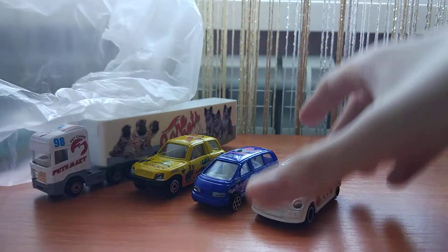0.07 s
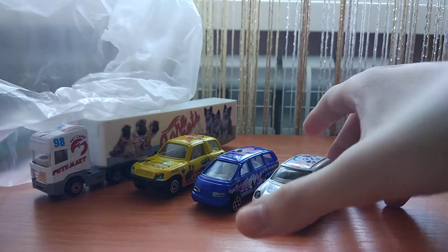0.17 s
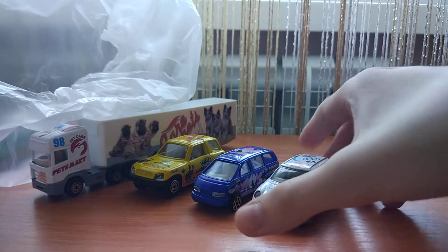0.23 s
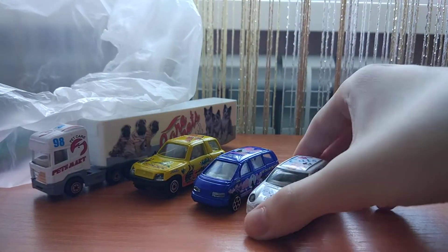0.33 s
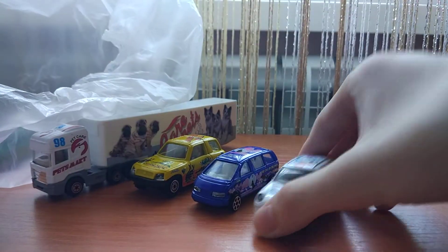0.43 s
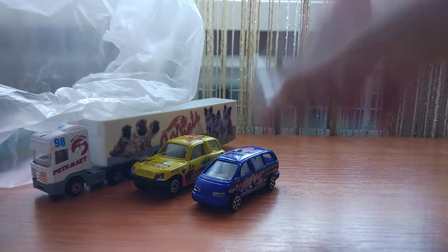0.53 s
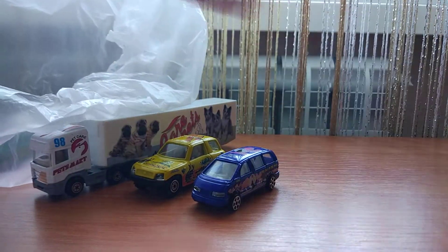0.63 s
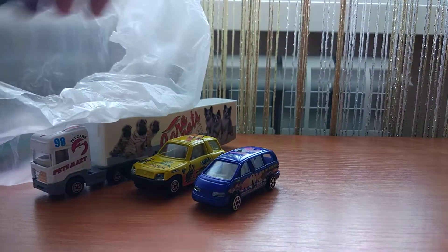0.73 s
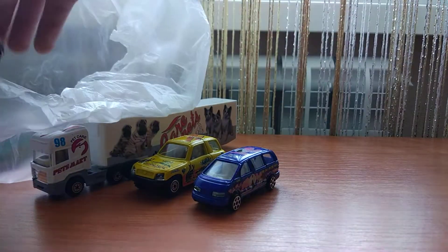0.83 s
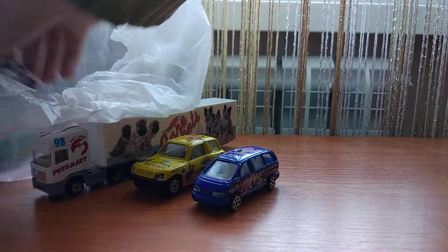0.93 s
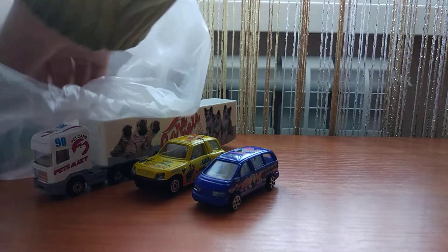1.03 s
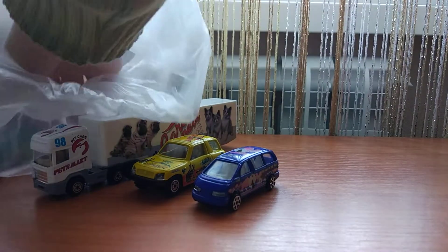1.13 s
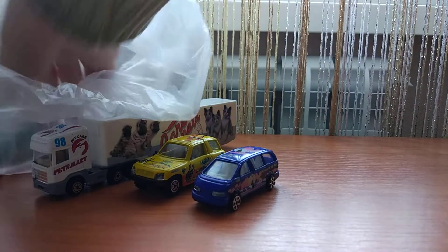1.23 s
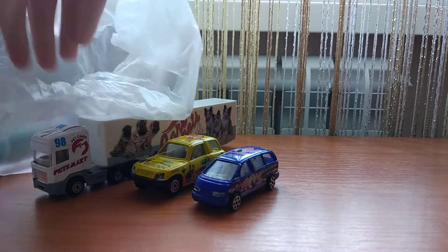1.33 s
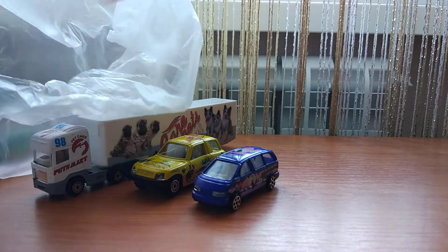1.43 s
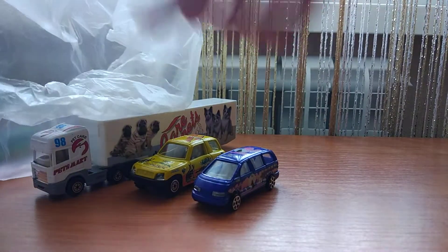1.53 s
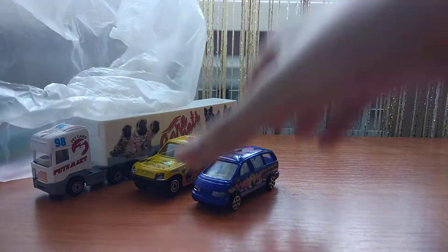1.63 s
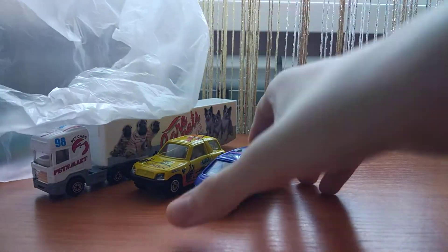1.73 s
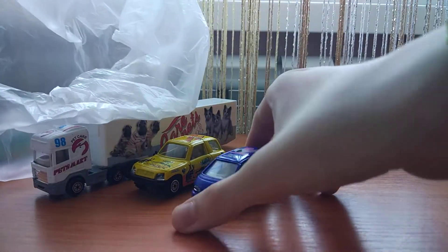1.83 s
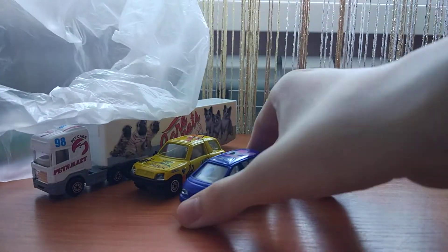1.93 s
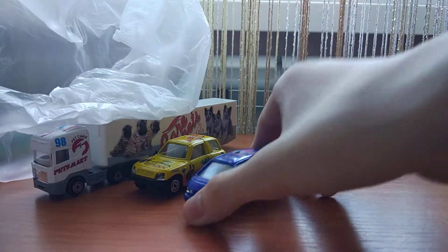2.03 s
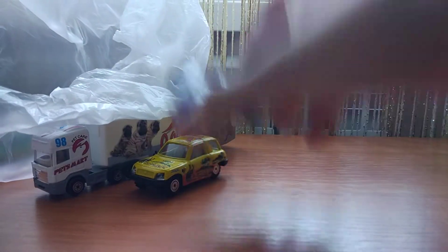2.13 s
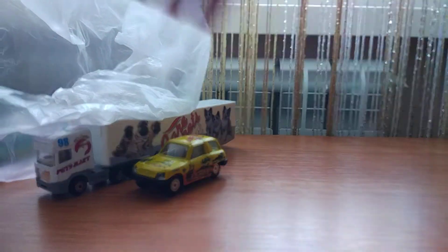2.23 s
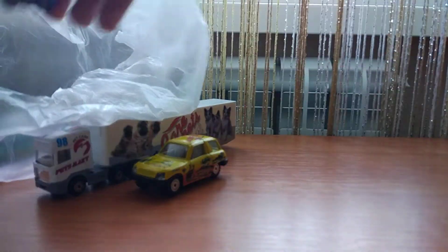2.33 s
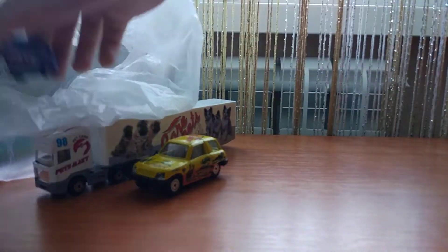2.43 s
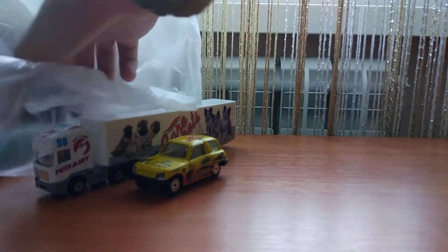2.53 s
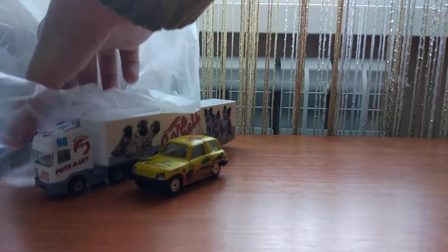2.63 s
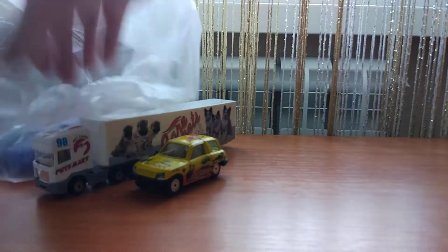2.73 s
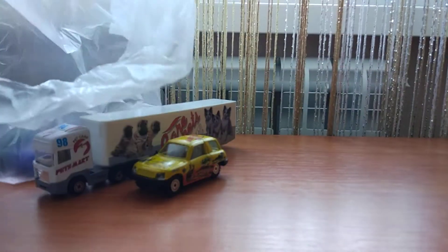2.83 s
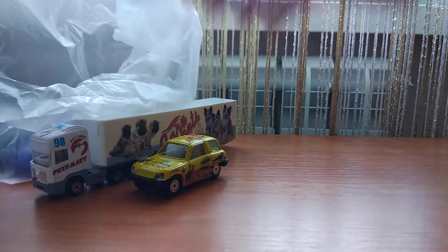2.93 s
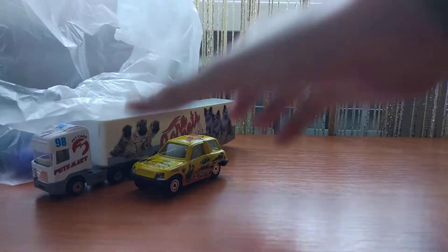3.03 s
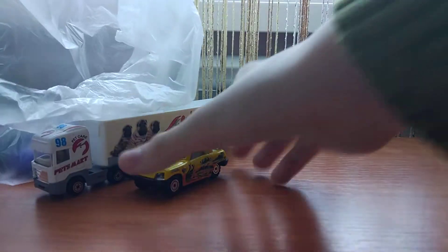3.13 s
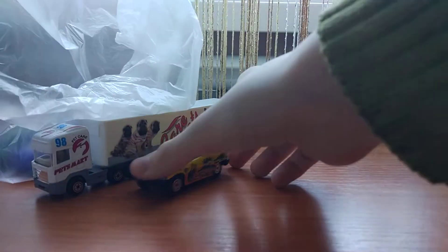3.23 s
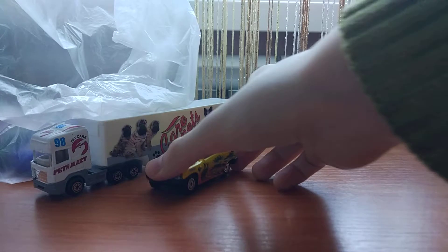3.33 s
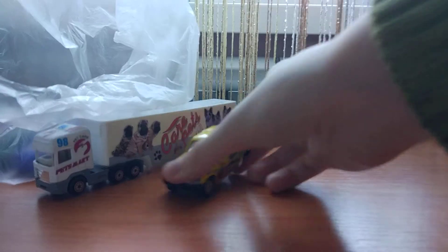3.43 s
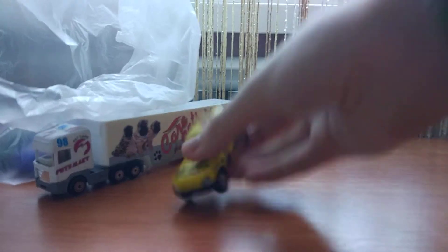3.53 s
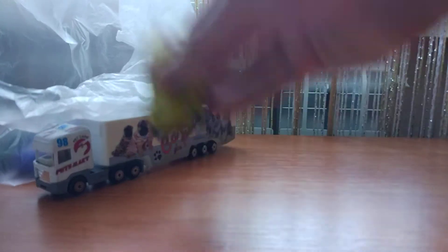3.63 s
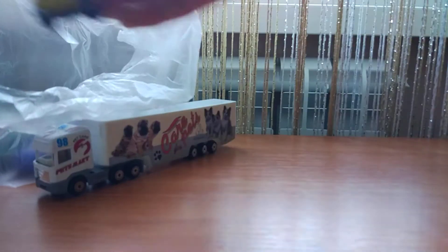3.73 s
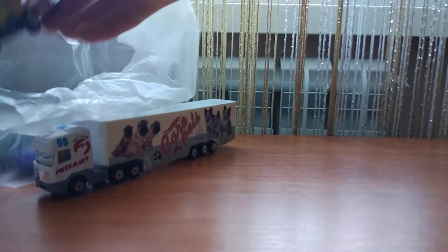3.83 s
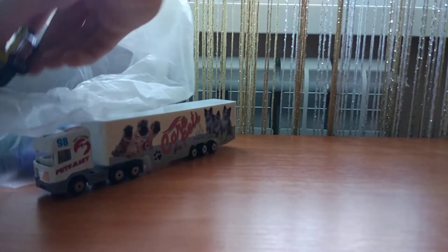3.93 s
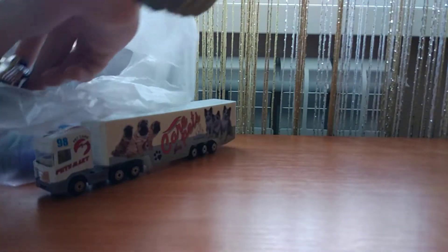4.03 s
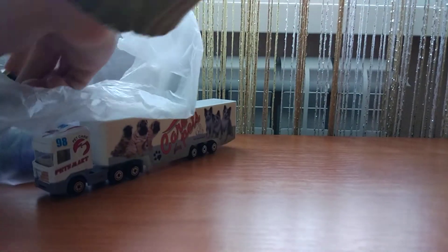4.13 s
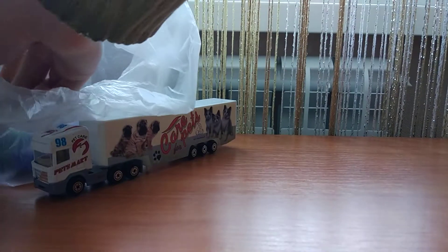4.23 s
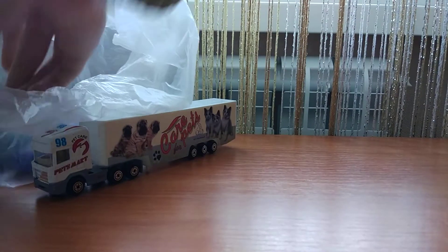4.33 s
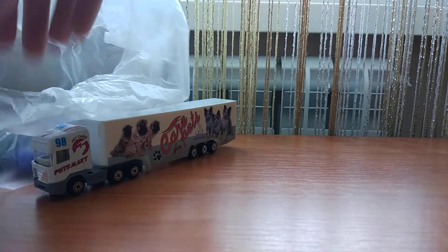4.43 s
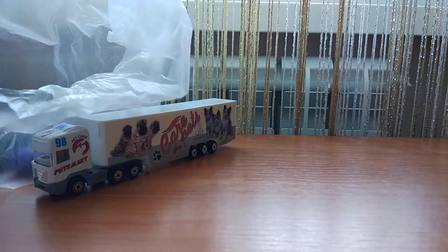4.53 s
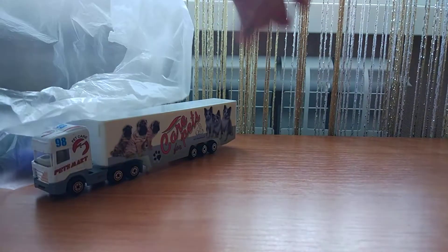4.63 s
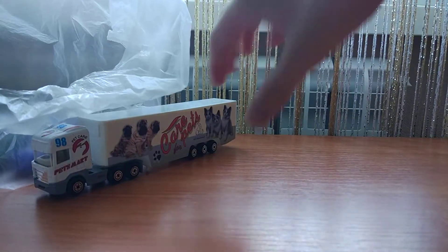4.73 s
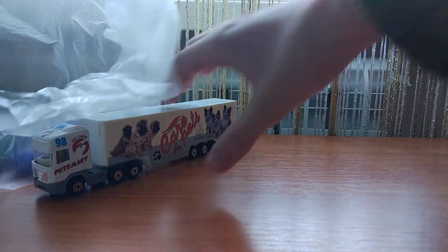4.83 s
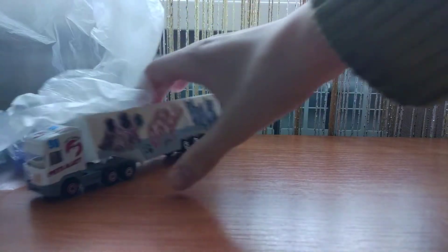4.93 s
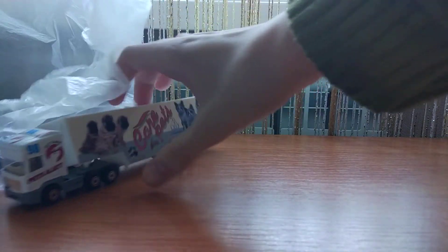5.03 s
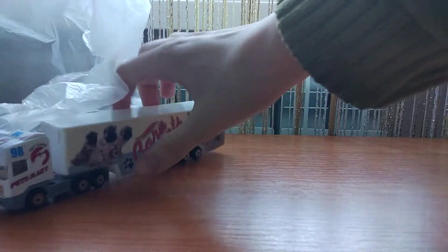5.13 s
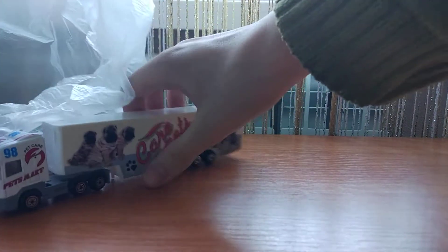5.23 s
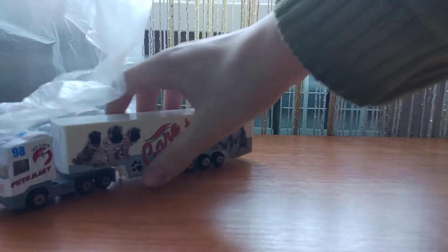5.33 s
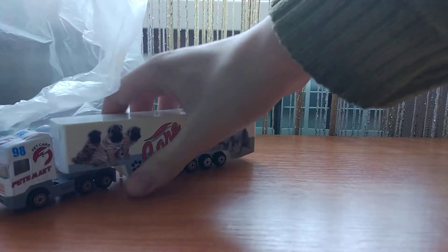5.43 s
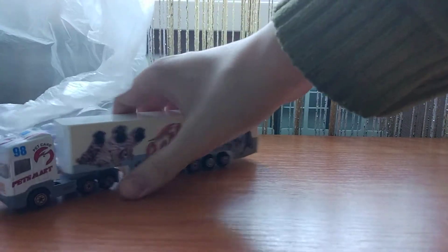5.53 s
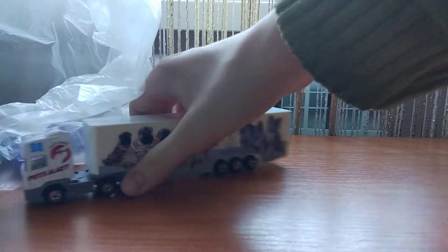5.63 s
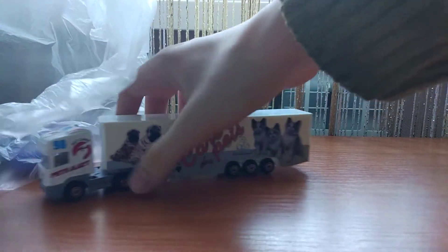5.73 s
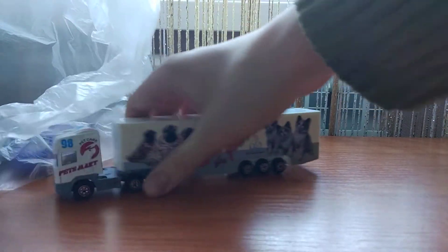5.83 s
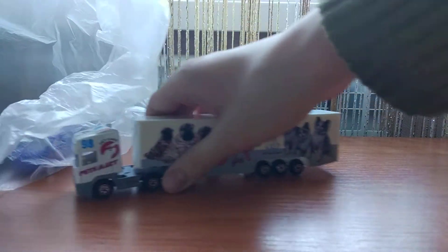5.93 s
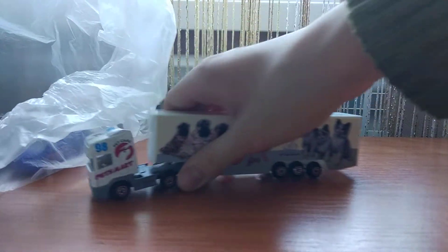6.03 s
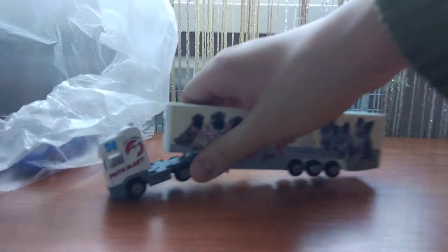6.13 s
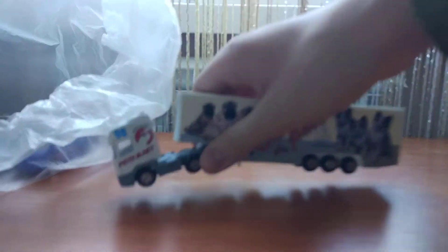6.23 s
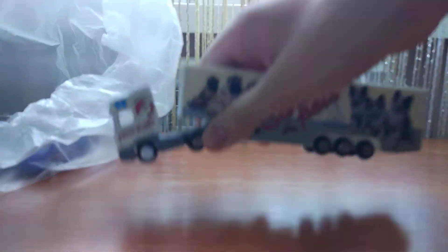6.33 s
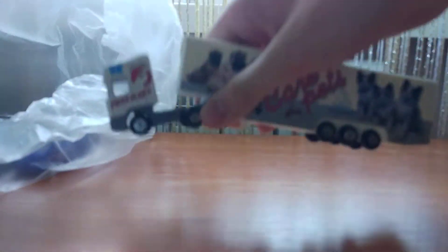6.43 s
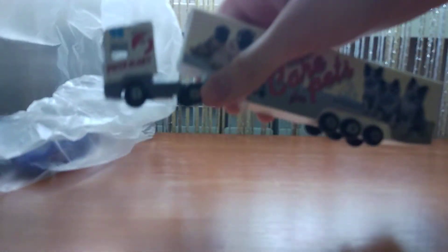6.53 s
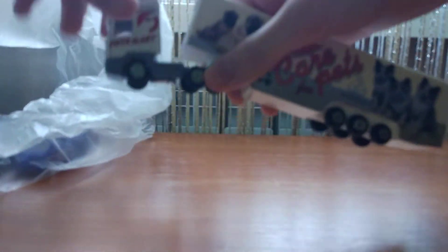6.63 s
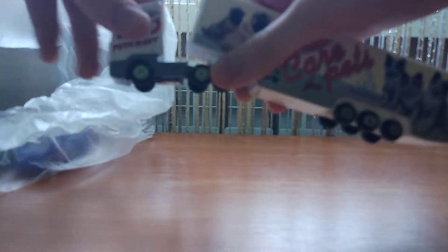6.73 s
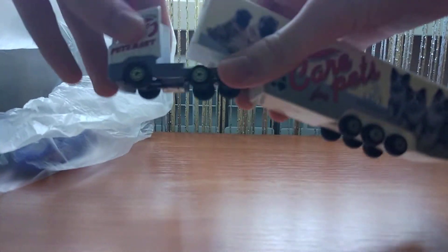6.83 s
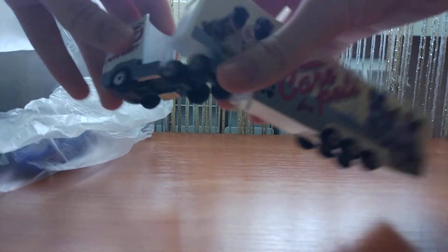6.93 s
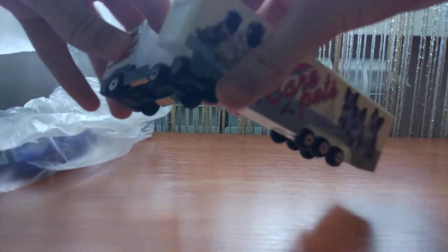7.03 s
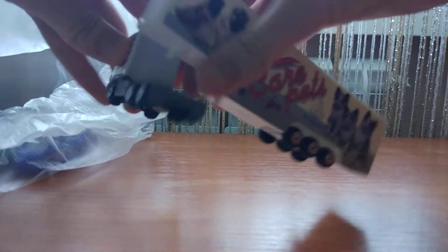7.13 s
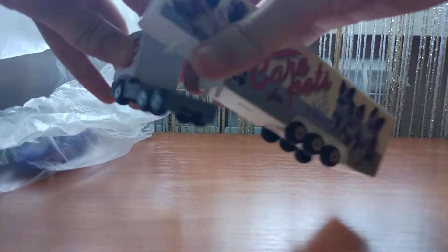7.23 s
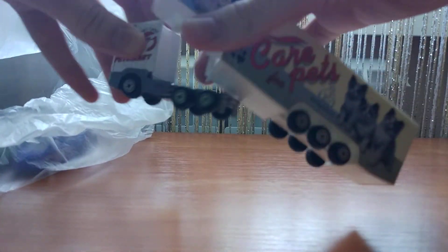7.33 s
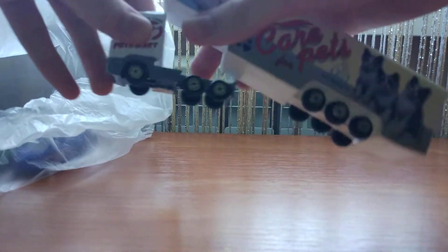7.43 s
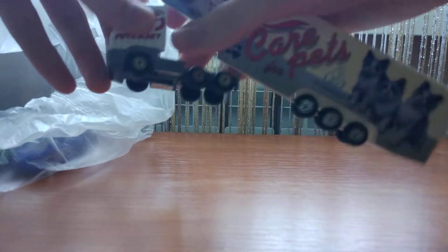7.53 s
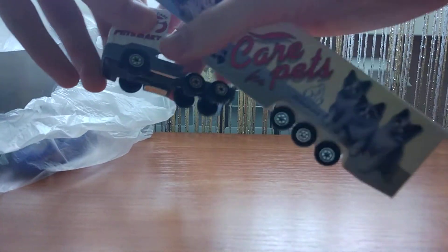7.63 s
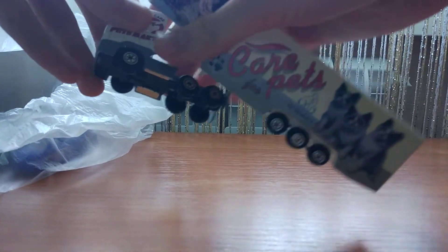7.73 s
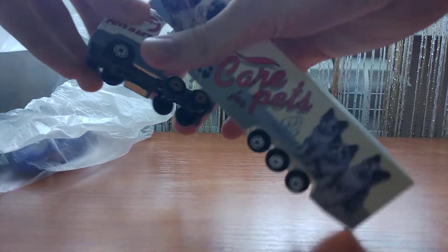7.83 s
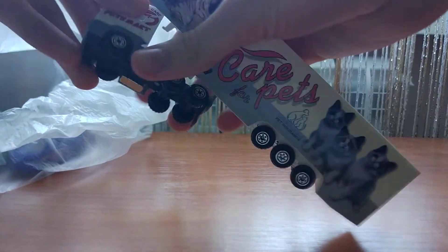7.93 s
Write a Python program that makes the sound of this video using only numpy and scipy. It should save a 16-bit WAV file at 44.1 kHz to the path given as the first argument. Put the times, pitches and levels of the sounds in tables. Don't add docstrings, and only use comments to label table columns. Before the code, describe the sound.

A small quiet room with faint hiss, recorded close in stereo; bright bag crinkles lean left. At 0.3-0.7 s a small metal car is picked up with tiny ticks and rattles. Film crinkles from 0.75 s, snapping at 1.1 s, and the car lands with clacks at 1.35-1.5 s, leaving a faint ring. A soft touch and tick at 1.9 s, quiet, then bag snaps at 2.5-2.6 s and a loud dense cluster of metallic clacks with table thuds at 2.7-2.87 s. Light rattling at 3.25-3.55 s, thin crinkles around 4.15-4.3 s, then another hard clatter at 4.32-4.46 s. From 4.83 s a hollow plastic truck scrapes and bumps on wood, strongest at 5.14 and 5.23 s, again at 5.6-5.85 s. Lifted after 6.1 s, it gives light axle ticks, then boxy joint knocks from 6.9 s, loudest at 7.34-7.4 and 7.57-7.7 s, with final clicks near 7.85 s.

```python
import sys
import numpy as np
from scipy import signal
from scipy.fft import rfft, irfft, next_fast_len
from scipy.io import wavfile
from scipy.ndimage import uniform_filter1d, map_coordinates

SR = 44100
rng = np.random.default_rng(int(sys.argv[2]) if len(sys.argv) > 2 else 0)


def wrap_up_sound(samples):
    columns = np.atleast_2d(samples).T
    tamed = np.clip(columns, -1, 1)
    steps = np.round(tamed * 32767).astype(np.int16)
    wavfile.write(sys.argv[1], SR, steps)


def nominal_scale(level):
    x = np.asarray(level, float) / 20
    return 10 ** x


N = 351477
TOP_HZ = 15850

# (pitch [Hz], width [Hz], level [dB])
METAL = [(3000, 110, -4), (4500, 200, -7), (6360, 1400, -6.5)]
# (pitch [Hz], width [Hz], level [dB])
HOLLOW = [(450, 50, 7.5), (646, 220, -4), (1330, 57, 3.5), (1700, 530, 1.5), (2120, 170, -16),
          (3140, 210, 7)]
# (pitch [Hz], width [Hz], level [dB])
BOARD = [(190.6, 12, 0.5), (223.7, 27, 6.5), (267.5, 13, 3.5), (313.2, 4.5, 3.5), (380, 4.5, -1),
         (403, 17, -54)]
# (start [s], held [s], scrape level [dB], table hum level [dB])
TOUCHES = [(.3, 0.12, -55.5, -66), (.97, 0.2, -58, -56), (1.2, 0.1, -40, -54.5), (1.38, 0.099, -35, -43),
           (1.89, 0.062, -45, -49), (2.44, 0.2, -47, -58), (2.71, 0.13, -35.5, -38),
           (3.16, 0.027, -58, -54.5), (3.27, 0.076, -43, -53), (3.38, 0.088, -44, -58.5),
           (4.33, 0.0083, -34.5, -40.5), (4.4, 0.013, -36, -31.5), (4.45, 0.03, -27.5, -31),
           (4.92, 0.06, -32.5, -40.5), (5.07, 0.023, -26, -36), (5.17, 0.095, -29.5, -43),
           (5.3, 0.043, -39, -52), (5.55, 0.16, -33, -46.5), (5.72, 0.12, -58, -49),
           (5.845, 0.012, -25.5, -38), (5.94, 0.062, -31.5, -49), (6.04, 0.028, -41, -49),
           (6.7, 0.18, -55.5, -64), (7.03, 0.19, -56, -69), (7.55, 0.079, -43.5, -75),
           (7.67, 0.077, -49, -62)]


def unit(x):
    return x / np.sqrt(np.mean(x ** 2) + 1e-20)


def along(points, hz):
    f, v = np.transpose(points)
    return np.interp(np.log(hz + 1), np.log(f + 1), v)


def wobble(rate):
    knots = rng.standard_normal(int(N * rate / SR) + 4)
    return map_coordinates(knots, [np.arange(N) * rate / SR])


def filtered(x, response):
    m = next_fast_len(x.shape[-1] + 8192)
    spectrum = rfft(x, m) * response(np.fft.rfftfreq(m, 1 / SR))
    return irfft(spectrum, m)[..., :x.shape[-1]]


def resonances(modes, between_db):
    def response(f):
        ringing = sum(nominal_scale(db) * 1j * f * w / (c * c - f * f + 1j * f * w) for c, w, db in modes)
        return nominal_scale(between_db) + ringing
    return response


def struck(modes):
    return [(hz, width, db + rng.normal(0, 3.5)) for hz, width, db in modes]


def highpass(hz):
    return lambda f: (1j * f / (hz + 1j * f)) ** 2


def lumps(depth_db, count):
    knots = depth_db * rng.standard_normal(count)
    return lambda f: nominal_scale(np.interp(np.sqrt(f / (SR / 2)), np.linspace(0, 1, count), knots))


def lag(s):
    # (time [s], delay of the left port [ms])
    place = [(.45, .18), (.55, -.2), (1.8, -.15), (1.88, .09), (2.4, .09), (2.5, -.14), (3.1, -.14),
             (3.2, .03), (3.9, .04), (4.0, -.2), (4.6, -.2), (4.8, 0), (5.9, -.04), (6.1, .1), (8, .18)]
    late_s = np.interp(s, *np.transpose(place)) / 1000
    return lambda f: np.exp(-1j * np.pi * f * late_s * np.array([[1], [-1]]))


def gestures(rows, column, rule):
    rise, fall, linger_db, linger_fall, rest_db = rule
    t = np.arange(0, N + 64, 64) / SR
    start, held, db = np.array(rows)[:, [0, 1, column], None].transpose(1, 0, 2)
    before = np.maximum(start - t, 0)
    after = np.maximum(t - start - np.abs(held), 0)
    remnant = (after > 0) * nominal_scale(linger_db - linger_fall * after)
    shape = nominal_scale(db - rise * before) * (nominal_scale(-fall * after) + remnant)
    gain = np.sqrt(nominal_scale(2 * rest_db) + np.sum(shape ** 2, axis=0))
    return np.interp(np.arange(N) / SR, t, gain)


def grains(count, low_hz, high_hz, cycles, scatter_db, spread_s, clump_db):
    draw = rng.random((count, 4))
    hz = low_hz * (high_hz / low_hz) ** draw[:, 1:2]
    start = (draw[:, 0] * (N - 200)).astype(int) + 30
    clump = clump_db * (wobble(50) + wobble(250))[start]
    size = nominal_scale(-scatter_db * np.log(1.01 - draw[:, 2]) + clump)[:, None]
    step = np.arange(96)
    pair = []
    for side in (-.5, .5):
        t = step / SR - side * spread_s * (2 * draw[:, 3:] - 1) - spread_s / 2
        click = size * (t > 0) * np.sin(2 * np.pi * hz * t) * np.exp(-np.abs(t) * hz / cycles)
        pair.append(np.bincount((start[:, None] + step).ravel(), click.ravel(), N)[:N])
    return unit(np.array(pair))


def patchy(depth_db):
    z = signal.stft(rng.standard_normal((2, N)), nperseg=256)[2]
    field = uniform_filter1d(rng.standard_normal(z.shape[1:]), size=16, axis=0)
    field = uniform_filter1d(field, size=3, axis=1)
    return unit(signal.istft(z * nominal_scale(depth_db * unit(field)), nperseg=256)[1][:, :N])


def room(x, length):
    # (pitch [Hz], time to fall 60 dB [s])
    walls = [(200, 0.047), (2000, 0.3), (10000, 0.21)]
    hz, t, z = signal.stft(rng.standard_normal((2, length)), SR, nperseg=256)
    tail = signal.istft(z * nominal_scale(-60 * t / along(walls, hz)[:, None]), SR, nperseg=256)[1]
    return signal.fftconvolve(x, tail / np.linalg.norm(tail[0]), axes=1)


def damped_notes(events, rise_s, level_db):
    out, t = np.zeros(N + SR), np.arange(SR // 4) / SR
    for s, db, hz, t60 in events:
        pair = np.sin(2 * np.pi * hz * t) + .5 * np.sin(2 * np.pi * 1.17 * hz * t)
        fade = nominal_scale(db + level_db - 60 * t / t60) * (1 - np.exp(-t / rise_s))
        out[round(s * SR):][:len(t)] += fade * pair
    return filtered(out[:N], highpass(182)) * nominal_scale([[-2], [2]])


def shivers(events, width, rise_s):
    out, t = np.zeros((2, N + SR)), np.arange(3072) / SR
    for s, db, hz, t60 in events:
        fade = nominal_scale(-60 * t / t60) * (1 - np.exp(-(t / rise_s) ** 2))
        shiver = fade * (rng.standard_normal(len(t)) + 1.05 * rng.standard_normal((2, len(t))))
        part, late = resonances([(hz, width * hz, 0)], between_db=-20), lag(s)
        ring = filtered(shiver, lambda f: part(f) * late(f) * highpass(400)(f))
        out[:, round(s * SR):][:, :len(t)] += nominal_scale(db) * ring / np.max(np.abs(ring))
    return out[:, :N] + nominal_scale(-5) * room(out[:, :N], length=6500)[:, :N]


def knocks(events, usual_t60, modes, between_db, level_db, thud_db, wet_db, rise, top_db, lead_db, dip_db,
           lean_db, shorten=0):
    lead_s, lead_grows_s, t60_scatter = .012, .003, .15
    out, t = np.zeros((2, N + SR)), np.arange(3072) / SR
    for s, db, treble_db, body_db in events:
        t60 = usual_t60 * nominal_scale(-shorten * treble_db) * np.exp(t60_scatter * rng.standard_normal())
        u = np.maximum(t - lead_s, 0)
        swell = nominal_scale(-60 * u / max(t60, .004)) * (1 - np.exp(-(u / (rise * t60)) ** 2))
        swell = swell + nominal_scale(lead_db) * np.exp(-np.abs(t - lead_s) / lead_grows_s)
        spray = swell * nominal_scale(5 * rng.standard_normal(len(t)))
        alike = np.array([[.87], [.44]]) * rng.standard_normal((2, len(t)))
        blow = spray * np.array([alike[0] + alike[1], alike[0] - alike[1]])
        body = resonances(struck(modes), between_db)
        colour = lumps(depth_db=3, count=30)
        tilt = [(250, body_db + 13.5), (900, body_db + 14), (3300, 0), (4500, dip_db),
                (9000, treble_db + 2.5), (11500, treble_db), (16000, 1.22 * treble_db + top_db)]
        ring = filtered(blow, lambda f: body(f) * colour(f) * lag(s)(f) * highpass(200)(f) * nominal_scale(along(tilt, f)))
        ring = ring / np.max(np.abs(ring))
        push = (u > 0) * np.exp(-u / 0.00033) * nominal_scale(thud_db + body_db)
        push = filtered(push, resonances(struck(BOARD), between_db=-6))
        push = filtered(push, lambda f: highpass(140)(f) ** 2)
        pan_db = 0.14 * treble_db + lean_db
        hit = nominal_scale(db + level_db) * (ring * nominal_scale([[pan_db], [-pan_db]]) + push)
        tail = nominal_scale(wet_db) * room(hit[:, :1536], length=6500)
        start = round((s - lead_s - .3 * rise * t60) * SR)
        out[:, start:][:, :len(t)] += hit
        out[:, start + 200:][:, :tail.shape[1]] += tail
    return out[:, :N]


def metal_knocks(events, t60_s, wet_db, shorten=0):
    return knocks(events, t60_s, METAL, between_db=0, level_db=-2, thud_db=-3, wet_db=wet_db, rise=.09,
                  top_db=0, lead_db=-31, dip_db=-1, lean_db=.5, shorten=shorten)


def plastic_knocks(events, t60_s, top_db, lead_db):
    return knocks(events, t60_s, HOLLOW, between_db=2.5, level_db=-2.5, thud_db=-22, wet_db=-11, rise=.088,
                  top_db=top_db, lead_db=lead_db, dip_db=-1.5, lean_db=-.55)


def room_tone():
    # (pitch [Hz], level per Hz [dB])
    air = [(24, -45), (40, -27), (91, -16), (171, 12), (231, 14.5), (896, -18), (2770, 4), (5720, -0.5),
           (9450, -44), (16000, -58)]
    shared, own = rng.standard_normal(N), rng.standard_normal((2, N))
    bass = filtered(shared, lambda f: 1 / (1 + (f / 700) ** 2))
    treble = filtered(own, lambda f: 1 / (1 + (700 / (f + 1)) ** 2))
    return nominal_scale(-69) * unit(filtered(bass + treble, lambda f: nominal_scale(along(air, f))))


def lens():
    # (first step [s], number of steps)
    focus = [
        (2.0828, 7),
        (3.8475, 2),
        (6.1452, 4),
    ]
    step_s = .03327
    case = [(1900, 700, 0), (3300, 900, 0)]  # (pitch [Hz], width [Hz], level [dB])
    kicks = np.zeros(N)
    for s, steps in focus:
        for k in range(steps):
            kicks[round((s + k * step_s) * SR)] = 1
    clicks = np.convolve(kicks, rng.standard_normal(60))[:N]
    clicks = filtered(clicks, resonances(case, between_db=-40))
    return nominal_scale(-42) * clicks / np.max(np.abs(clicks)) * nominal_scale([[-14], [0]])


def table():
    # (rise [dB/s], fall [dB/s], lingering level [dB], its fall [dB/s], level at rest [dB])
    hum_rule = (1000, 170, -35, 40, -68)
    push = nominal_scale(2.6 * wobble(40)) * (rng.standard_normal(N) + 0.45 * rng.standard_normal((2, N)))
    hum = filtered(push, resonances(BOARD, between_db=-24))
    hum = filtered(hum, lambda f: highpass(135)(f) ** 4 / (1 + 1j * f / 600))
    return nominal_scale(-3) * nominal_scale([[-1.5], [1.5]]) * gestures(TOUCHES, -1, hum_rule) * unit(hum)


def thumps():
    # (time [s], peak level [dB], pitch [Hz], time to fall 60 dB [s])
    thuds = [(0.284, -43.5, 231, 1), (0.334, -37, 232, 0.29), (1.289, -26.5, 248, 0.047),
             (1.34, -25.5, 320, 0.069), (1.395, -32, 204.3, 0.56), (1.906, -34.5, 246.4, 0.37),
             (1.95, -36, 230, 0.11), (2.7095, -9.5, 241, 0.034), (2.747, -13.5, 325, 0.029),
             (2.803, -22, 330, .04), (2.837, -18, 294, 0.048), (1.397, -20, 330, 0.058),
             (4.424, -14, 334, .05), (4.341, -32, 295, 0.045), (5.848, -24.5, 274, 0.098),
             (2.78, -23, 366, 0.059), (3.274, -32, 232, 0.048), (3.302, -31, 215.5, 0.19),
             (4.32, -27.5, 257, 0.11), (4.462, -14, 380, 0.036), (4.525, -24, 397, 0.044),
             (4.3925, -7.5, 337, 0.037), (4.44, -18, 398, 0.06)]
    return damped_notes(thuds, rise_s=.0014, level_db=-4)


def scrape():
    # (pitch [Hz], width [Hz], level [dB])
    wheels = [(1421, 12, 9.5), (1790, 130, -5.5), (2376, 340, 0), (3530, 1770, 11)]
    # (rise [dB/s], fall [dB/s], lingering level [dB], its fall [dB/s], level at rest [dB])
    scrape_rule = (275, 231, -76, 31, -62.5)
    ticking = grains(count=12000, low_hz=700, high_hz=5000, cycles=.6, scatter_db=3, spread_s=.0003, clump_db=2.5)
    chassis = filtered(ticking + .5 * patchy(depth_db=-5.5), resonances(wheels, between_db=-34))
    dull = filtered(chassis, lambda f: highpass(450)(f) / (1 + 1j * f / 3500) ** 2)
    return nominal_scale(-12) * gestures(TOUCHES, 2, scrape_rule) * unit(dull)


def bag():
    # (pitch [Hz], level per Hz [dB])
    film_colour = [(290, -31.5), (500, -9.5), (2360, -17.5), (3700, -14.5), (5240, -9), (7420, -5),
                   (9770, -2), (16000, -5)]
    # (start [s], held [s], crinkle level [dB])
    crinkle = [(0.0, 0.0064, -56), (.76, 0.22, -61.5), (.98, 0.013, -46), (1.06, 0.19, -46),
               (1.3, 0.16, -45), (2.37, 0.1, -55), (2.5, 0.039, -52), (2.575, 0.03, -39.5),
               (2.64, .05, -53), (2.72, 0.061, -40.5), (3.35, 0.29, -58.5), (3.87, 0.32, -54.5),
               (4.2, 0.14, -52), (4.32, 0.059, -40.5), (4.46, 0.066, -43), (4.855, 0.13, -48),
               (5.07, 0.06, -43.5), (5.25, 0.39, -55.5), (5.82, 0.069, -52), (5.93, 0.13, -56.5),
               (6.5, 0.098, -57.5), (6.64, 0.16, -54.5), (6.95, 0.016, -51.5)]
    # (rise [dB/s], fall [dB/s], settling level [dB], its fall [dB/s], level at rest [dB])
    film_rule = (204, 172, -17, 18, -74)
    # (from [s], to [s], level change [dB])
    relax = [
        (2.7, 2.94, -10),
        (3.035, 3.15, -39),
        (3.771, 3.845, -4.5),
        (0.1, 0.18, -5),
        (4.66, 4.822, -6.5),
        (2.08, 2.355, -10),
    ]
    snapping = grains(count=21000, low_hz=2500, high_hz=16000, cycles=.8, scatter_db=3.4, spread_s=.0005,
                      clump_db=3.2)
    folds = nominal_scale(2.2 * wobble(45) + 2.2 * wobble(160)) * patchy(depth_db=4)
    sheet = snapping + .8 * folds

    def aside(f):
        return np.array([np.ones_like(f), 1 / (1 + 1j * f / 7000)])
    film = unit(filtered(sheet, lambda f: nominal_scale(along(film_colour, f)) * aside(f)))
    t = np.arange(N) / SR
    rest = nominal_scale(sum(db * ((t > start) & (t < end)) for start, end, db in relax))
    return nominal_scale(4.5) * gestures(crinkle, 2, film_rule) * uniform_filter1d(rest, size=500) * film


def creases():
    # (time [s], peak level [dB], treble level [dB])
    snaps = [(.252, -37, -5.5), (0.3622, -31.5, 12), (0.397, -31, 8), (0.4394, -33, -8), (.449, -33, -12.5),
             (0.5312, -38, 7), (0.6215, -46, 10), (0.641, -40, -16), (0.7416, -31, 0.5), (0.786, -33.5, 2),
             (0.801, -29, 26), (0.9739, -24, -0.5), (1.1218, -14, 9), (1.287, -16.5, 3), (1.844, -34, 10),
             (2.017, -33, -4), (2.0578, -32, -7.5), (2.2325, -29, -3.5), (2.244, -30, -6),
             (2.601, -10.5, 8), (3.041, -30, 20.5), (3.423, -27.5, 7), (3.693, -29, 17), (3.768, -27, 36),
             (3.8445, -31, -3.5), (4.146, -23, 26), (4.198, -23, 20), (4.246, -27, 19), (4.274, -18.5, 12),
             (4.301, -20, -2)]
    body_db = -23
    return metal_knocks([row + (body_db,) for row in snaps], t60_s=.023, wet_db=-14, shorten=.6)


def ticks():
    # (time [s], peak level [dB], pitch [Hz], time to fall 60 dB [s])
    sharp = [(.6232, -37, 8000, .004), (1.124, -28, 10000, .004), (2.4758, -26, 12000, .004),
             (2.7125, -11, 7000, .03), (2.8572, -21, 10500, .008), (3.0414, -22, 12000, .004),
             (3.085, -43, 10000, .008), (3.2398, -41, 9000, .005), (3.364, -37, 9500, .01),
             (3.537, -40, 6500, .007), (3.547, -41, 6000, .007), (3.7682, -25, 13000, .004),
             (4.4232, -9, 2400, .008), (5.8118, -20, 2000, .006), (6.0875, -36, 9000, .004),
             (6.114, -43, 6500, .007), (6.1288, -41, 7000, .006), (6.2064, -34, 10500, .004),
             (6.215, -44, 9500, .007), (6.534, -33, 9000, .004), (6.5709, -32, 10000, .004),
             (6.7445, -32, 9000, .004), (6.79, -33, 8500, .004), (7.0287, -27, 9500, .004),
             (7.0707, -31, 11000, .004), (7.0814, -39, 10000, .005), (7.163, -23, 11000, .005),
             (7.2318, -34, 9000, .005), (2.784, -13, 7000, .05), (2.82, -19, 6000, .08),
             (4.43, -18, 1300, .14), (7.866, -32, 7000, .012), (7.5685, -16, 3000, .005)]
    return shivers(sharp, width=.9, rise_s=.0003)


def rattles():
    # (time [s], peak level [dB], pitch [Hz], time to fall 60 dB
    # [s])
    loose = [(.424, -49, 4500, .015), (.432, -39, 5100, .02), (.44, -38, 6000, 0.055),
             (.441, -44.5, 1600, 0.022), (.45, -39, 1900, 0.045), (.481, -55, 3500, .02),
             (0.544, -53, 4700, 0.028), (.636, -41, 2600, 0.016), (0.645, -49, 3900, .02),
             (.664, -44, 1900, 0.036), (.68, -49, 2200, .025), (1.163, -23, 7300, 0.01),
             (1.352, -34.5, 5500, 0.013), (3.248, -47, 1950, 0.027), (3.277, -33.5, 2600, 0.047),
             (3.295, -32, 2060, 0.032), (3.297, -30, 4400, 0.011), (3.316, -32, 2500, 0.017),
             (3.343, -34.5, 3300, 0.013), (3.369, -42, 1300, 0.028), (3.395, -43, 1470, 0.034),
             (3.42, -41, 2400, 0.033), (3.45, -32.5, 2200, 0.07), (3.468, -37, 1990, .02),
             (3.478, -36, 2620, 0.027), (3.557, -47.5, 3500, 0.018), (4.335, -22.5, 2600, .03),
             (4.902, -35, 1520, 0.011), (4.9536, -34, 3200, 0.022), (4.959, -24.5, 1690, 0.085),
             (4.973, -30, 1300, 0.025), (5.078, -29, 1400, .02), (5.1205, -34, 1330, 0.022),
             (5.14, -13, 3240, 0.018), (5.158, -32, 3100, .02), (5.181, -26, 5900, 0.0095),
             (5.22, -28, 3000, 0.009), (5.2306, -20, 3140, 0.033), (5.382, -42, 2900, .02),
             (7.34, -16.5, 3370, 0.014), (7.353, -21.5, 2170, 0.11), (7.388, -36, 900, 0.022),
             (7.593, -31, 2260, 0.02), (7.664, -25, 1300, 0.045), (7.681, -41.5, 620, 0.027),
             (7.804, -37, 1920, 0.043), (7.83, -44, 1800, .025), (7.866, -35, 1400, .03),
             (4.426, -15.5, 1470, 0.037), (4.48, -28, 695, 0.14), (5.536, -32, 2740, .04),
              (5.58, -33.5, 1320, 0.06), (5.68, -28.5, 1330, 0.045), (5.70, -32.5, 1010, 0.016),
              (5.847, -29, 2900, 0.04), (5.875, -28, 2230, 0.033), (5.922, -30, 2280, 0.034),
              (5.97, -32, 2400, 0.042), (6.0939, -29.5, 1940, 0.018), (6.114, -35, 2300, .015),
              (7.41, -27.5, 2270, 0.023), (7.593, -22.5, 4770, .015)]
    return shivers(loose, width=.11, rise_s=.0011)


def axles():
    # (time [s], peak level [dB], treble level [dB])
    axle_ticks = [(6.3892, -43, 23), (6.533, -39, 21), (6.672, -37, 14), (6.742, -29.5, -4),
                  (6.886, -29.5, 5), (7.041, -35, 25), (7.067, -34, 34), (7.138, -28, 8), (7.151, -23.5, 5),
                  (7.162, -21.5, 17), (7.688, -19, 26)]
    body_db = -31
    return plastic_knocks([row + (body_db,) for row in axle_ticks], t60_s=.035, top_db=-35, lead_db=-38)


def boxy():
    # (time [s], peak level [dB], pitch [Hz], time to fall 60 dB [s])
    box_notes = [
        (5.811, -12, 920, 0.0088),
        (6.926, -23, 514, 0.032),
        (6.968, -20, 465, 0.029),
        (7.32, -19.5, 646, 0.014),
        (7.408, -27, 1700, 0.026),
        (7.568, -28.5, 453, 0.05),
        (7.848, -27.5, 1426, 0.033),
        (7.682, -32.5, 382, 0.062),
    ]
    return damped_notes(box_notes, rise_s=.00065, level_db=-4.5)


def truck():
    # (time [s], peak level [dB], treble level [dB], body level [dB])
    bumps = [(4.8313, -32, 13, -29), (4.8478, -27, 7, -25), (4.955, -16.5, -10, -17), (4.9714, -22, -7, -6),
             (5.0398, -21.5, -10, -17), (5.1217, -22, 3, -2), (5.1399, -8.5, -1, -14),
             (5.1574, -14.5, 0, -6), (5.2201, -26, -13, -13), (5.2288, -6, -6.5, -24),
             (5.5342, -47, -37, -22), (5.617, -17, 2.5, -11), (5.8118, -19, -6, -7), (5.844, -15, -1, -18),
             (6.0943, -25, -11, -17.5), (6.2042, -41, 1, -6)]
    # (time [s], peak level [dB], treble level [dB], body level [dB])
    joint = [(6.5708, -31, 25, 3), (6.715, -26, -7, -22.5), (6.925, -20.5, -1, -11),
             (6.9667, -17.5, -6, -11), (7.1243, -29, -7, -17), (7.2206, -24.5, 4, -23.5),
             (7.3208, -22, -2, -19), (7.3406, -11, -0.5, -11), (7.353, -9, -2, -22),
             (7.4085, -15.5, 2, -8.5), (7.556, -25, 2, -2.5), (7.5677, -14.5, 7.5, -10.5),
             (7.591, -14.5, 6.5, -18), (7.6057, -18.5, 14, -9), (7.664, -18.5, -4.5, -12),
             (7.6798, -16, -5.5, -13), (7.7738, -34, -5, -5), (7.8297, -28.5, -8, -16),
             (7.8466, -16, 3, -20), (7.9276, -26.5, -8, -18.5)]
    dragged = plastic_knocks(bumps, t60_s=.025, top_db=-20, lead_db=-19)
    folded = plastic_knocks(joint, t60_s=.025, top_db=-19, lead_db=-24)
    return dragged + folded


def shells():
    # (time [s], pitch [Hz], level [dB], time to fall 60 dB [s])
    rings = [
        (1.49, 1396, -48, 0.32),
        (4.558, 744, -60.5, 1),
    ]
    t = np.arange(N) / SR
    out = np.zeros(N)
    for s, hz, db, t60 in rings:
        fade = (t > s) * nominal_scale(db - 60 * np.abs(t - s) / t60 + 1.2 * wobble(30.5))
        out += fade * np.sin(2 * np.pi * hz * t)
    return out


def cars():
    # (time [s], peak level [dB], treble level [dB], body level [dB])
    contacts = [(1.1608, -17, 1, -8), (1.3384, -14, 2, -14), (1.394, -1.5, -15, -31),
                (1.4422, -7, -23, -28.5), (1.4674, -11, -12, -27), (1.9008, -28, -24, -53),
                (1.913, -22, -10.5, -25), (2.4904, -34, -10, -6), (2.707, 0, -4.5, -26),
                (2.7145, -5, -4, -40), (2.7275, -8, -1, -40), (2.7432, -4.5, -2, -25.5),
                (2.7498, -13, -9, -32), (2.7765, -4, -8, -26), (2.8018, -3, -6.5, -26.5),
                (2.819, -12, -14, -23), (2.8355, -9, -14, -44), (2.856, -6.5, -8.5, -26),
                (3.2767, -32, -18, -26), (3.2984, -22.5, -13, -21), (3.365, -29, -4, -32),
                (3.5552, -22, -10.5, -18), (3.953, -39, -4, -11), (4.3187, -7.5, -1.5, -24),
                (4.3912, 0, -3.5, -14.5), (4.4228, 0, -2.5, -5.5), (4.4405, -14, -23, -2),
                (4.46, -19, -32, -1)]
    return metal_knocks(contacts, t60_s=.022, wet_db=-11)


def scene():
    steady = scrape() + bag() + boxy()
    background = room_tone() + lens() + table() + thumps()
    small_parts = creases() + ticks() + rattles() + axles()
    toys = truck() + shells() + cars()
    return background + steady + nominal_scale(-2.5) * room(steady, length=12000)[:, :N] + small_parts + toys


def masked(x, under_db, luck_db):
    hz, _, z = signal.stft(x, SR, nperseg=1024)
    band = uniform_filter1d(uniform_filter1d(np.abs(z) ** 2, size=8, axis=1), size=3, axis=2)
    treble = band[:, (hz > 2200) & (hz < TOP_HZ)].mean(axis=1, keepdims=True)
    recent = signal.lfilter([.5], [1, -.5], treble, axis=2)
    cells = rng.standard_normal((1, z.shape[1] // 8 + 1, z.shape[2] // 3 + 1))
    luck = cells.repeat(8, axis=1).repeat(3, axis=2)[:, :z.shape[1], :z.shape[2]]
    stricter_db = 10 * (np.abs(hz[:, None] - 4800) < 1800)
    bar = np.minimum(recent * nominal_scale(2 * under_db + stricter_db), .6 * band)
    kept = (band * nominal_scale(2 * luck_db * luck) > bar) | (hz[:, None] < 2200)
    return signal.istft(z * kept, SR, nperseg=1024)[1][:, :N]


def roll_off(x):
    return signal.sosfilt(signal.butter(12, 16960, fs=SR, output="sos"), x)


def record(dry):
    # (pitch [Hz], level difference [dB])
    shade = [(60, -40), (110, 1.5), (380, 0), (1290, -2), (2380, 0.5), (4400, -1), (8120, 6.5), (15000, 25)]

    def ports(f):
        lean = nominal_scale(along(shade, f))
        return np.array([lean, np.ones_like(f)]) * 2 / np.sqrt(1 + lean ** 2)
    hiss = nominal_scale(-61.5) * filtered(rng.standard_normal((2, N)), highpass(290))
    heard = filtered(dry, ports) + hiss
    heard = heard / (1 + np.abs(heard / .85) ** 4) ** (1 / 4)
    heard = filtered(heard, lambda f: np.where(f < TOP_HZ, 1, nominal_scale(-45)))
    heard = masked(heard, under_db=-7.5, luck_db=4)
    return roll_off(heard)


dry = scene()
out = record(dry)
wrap_up_sound(out)
```